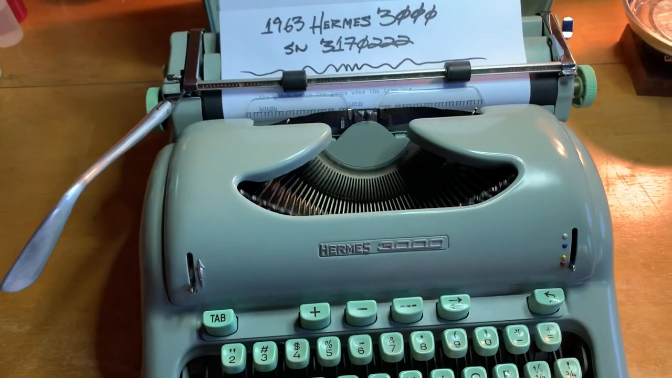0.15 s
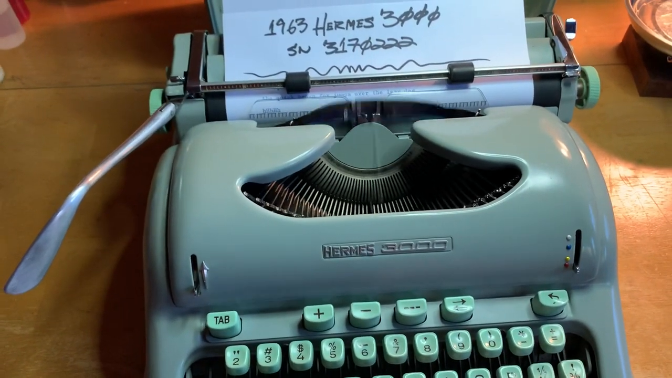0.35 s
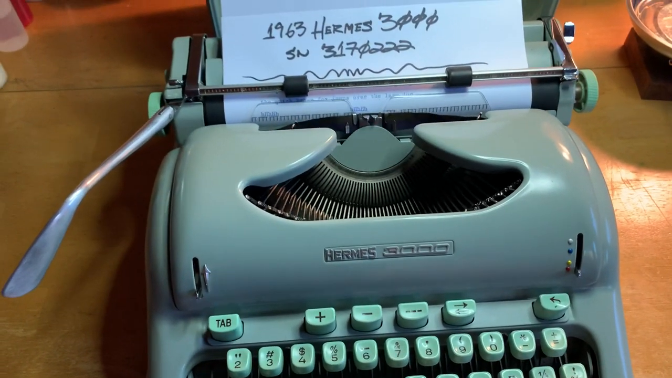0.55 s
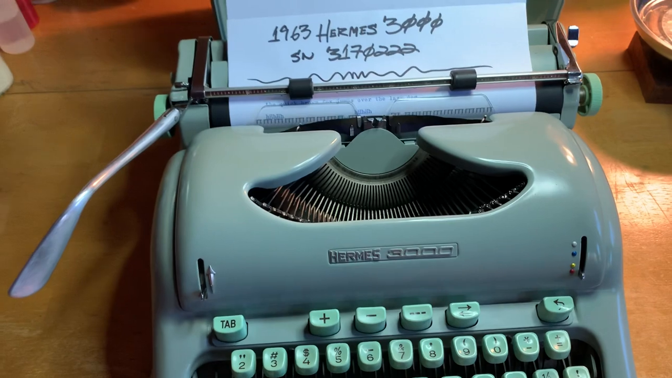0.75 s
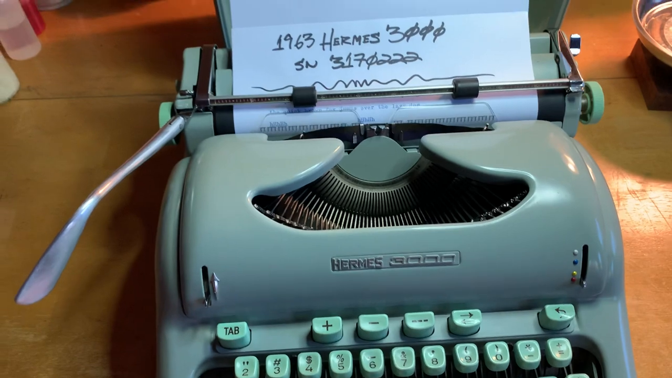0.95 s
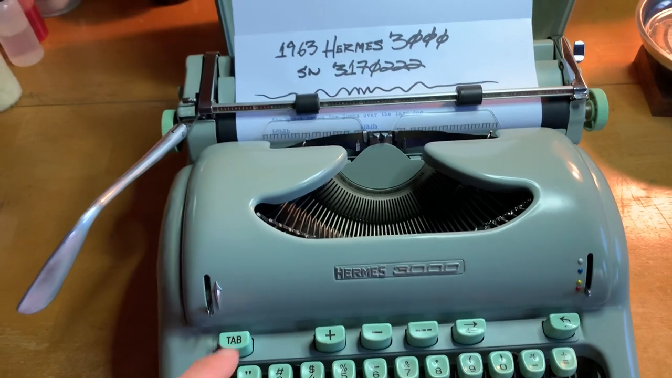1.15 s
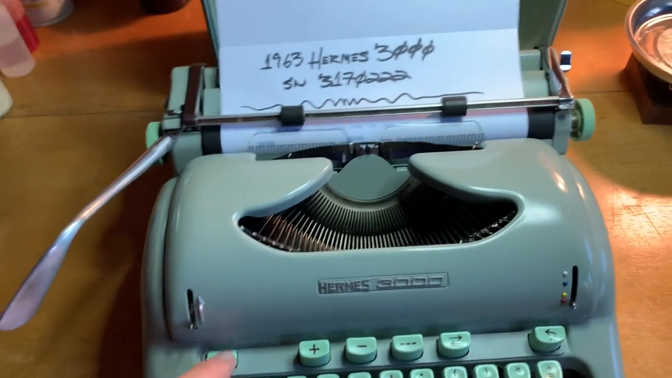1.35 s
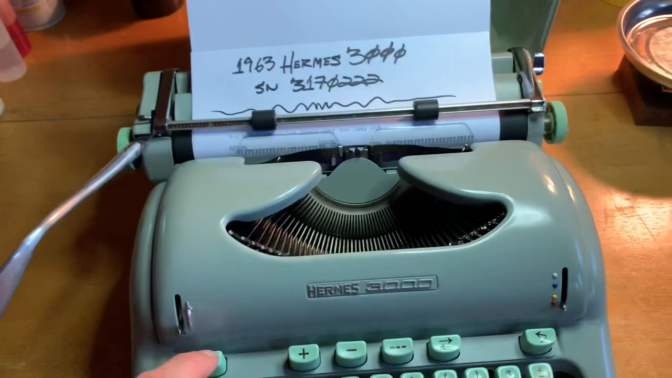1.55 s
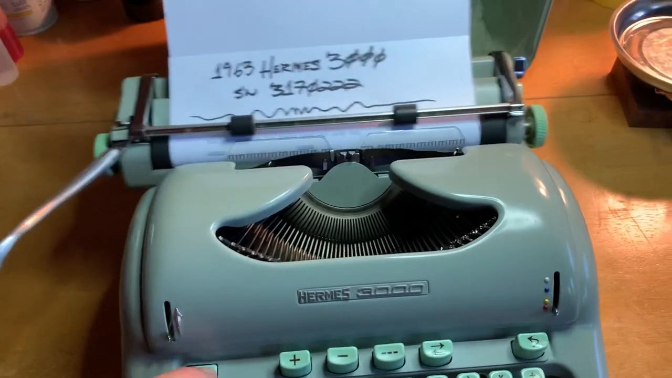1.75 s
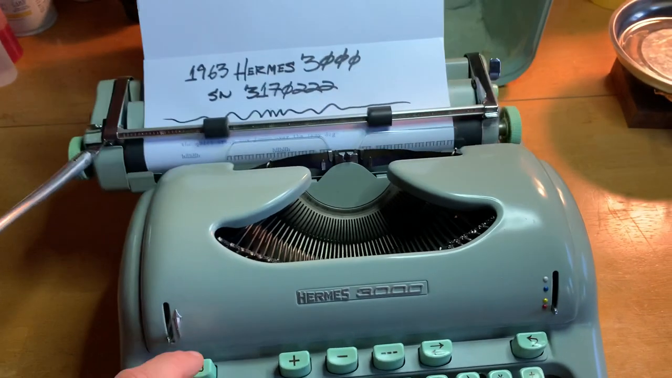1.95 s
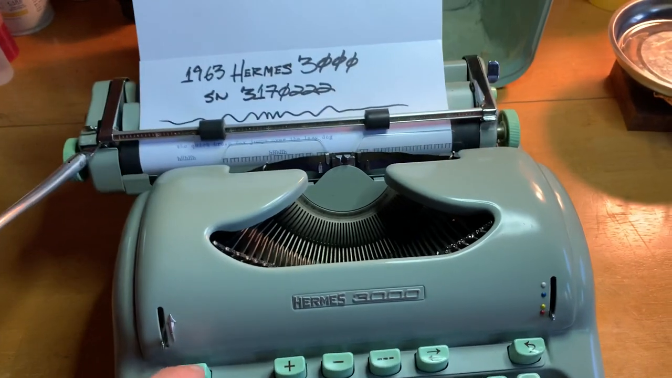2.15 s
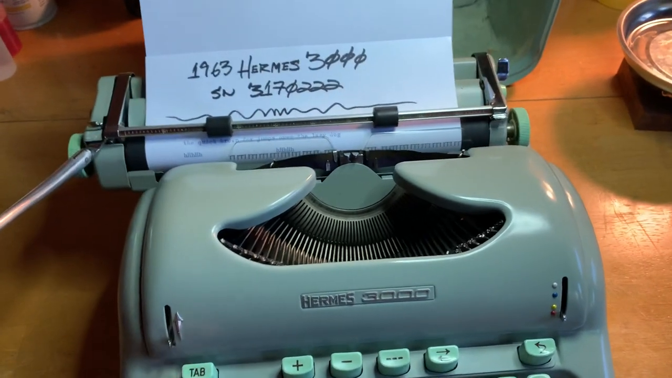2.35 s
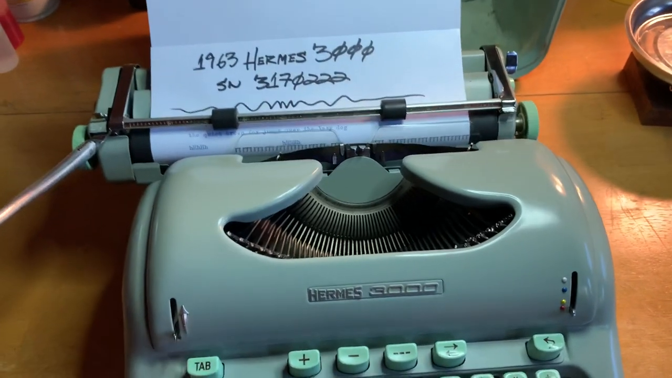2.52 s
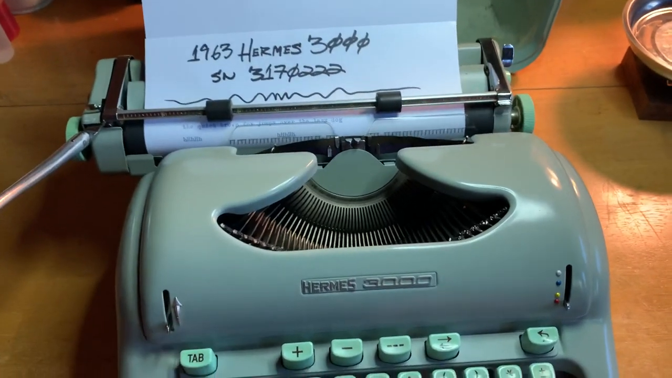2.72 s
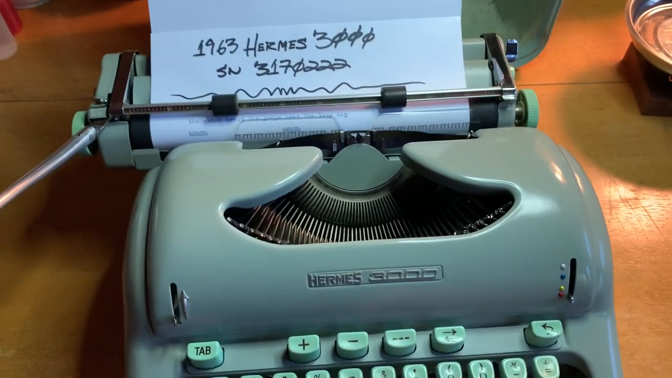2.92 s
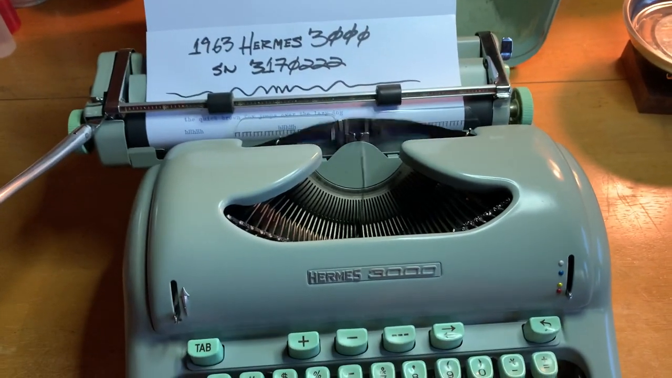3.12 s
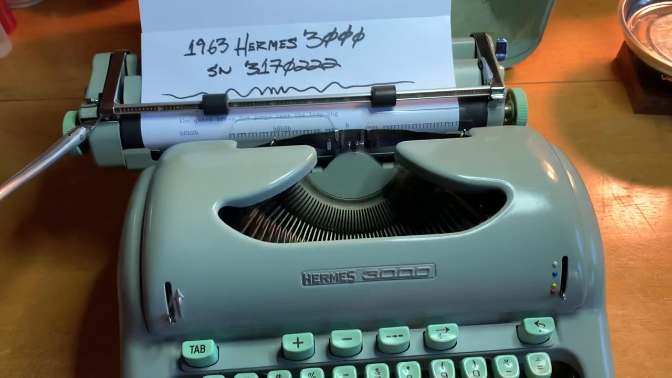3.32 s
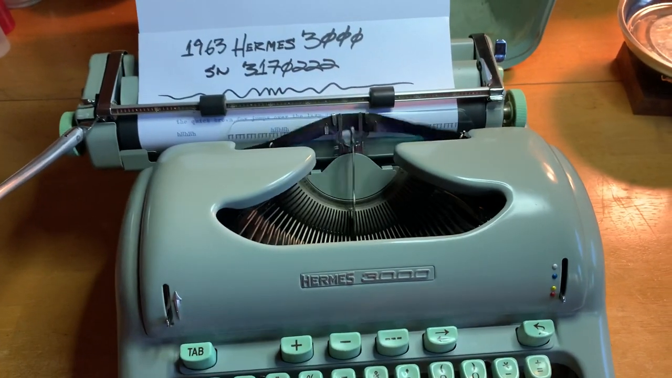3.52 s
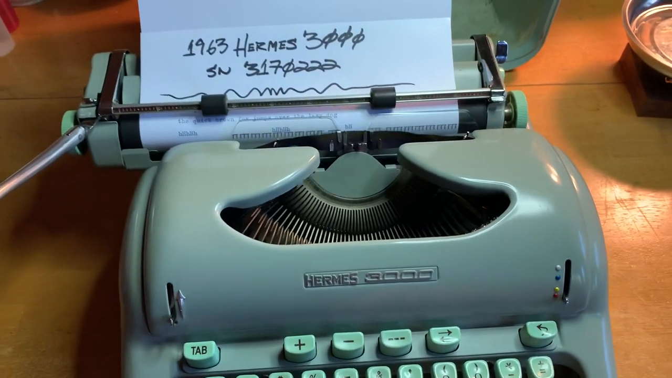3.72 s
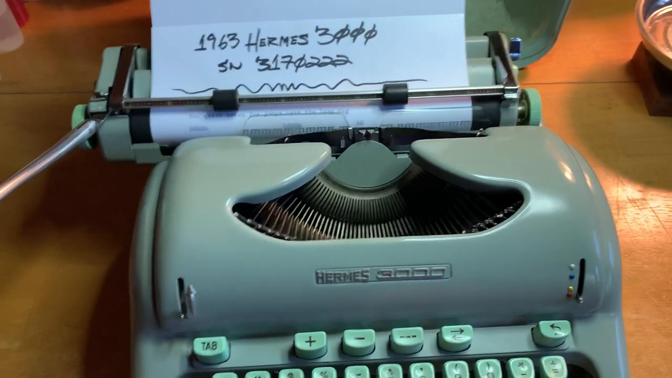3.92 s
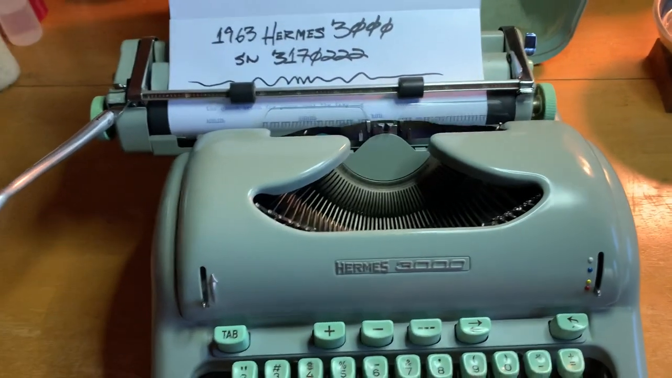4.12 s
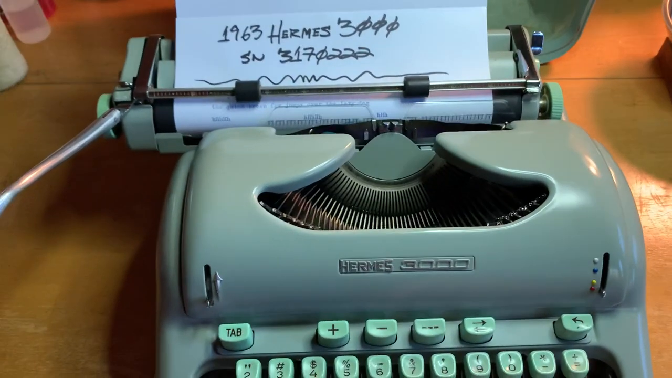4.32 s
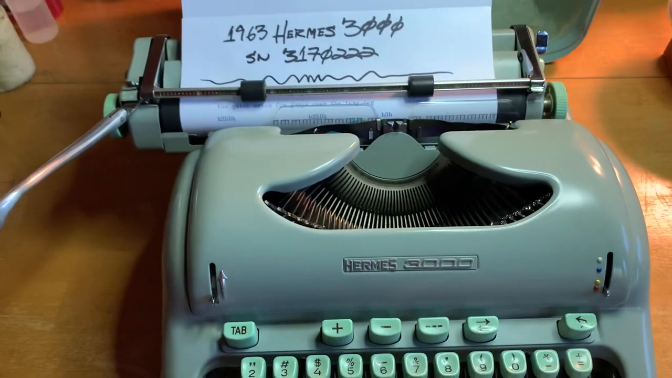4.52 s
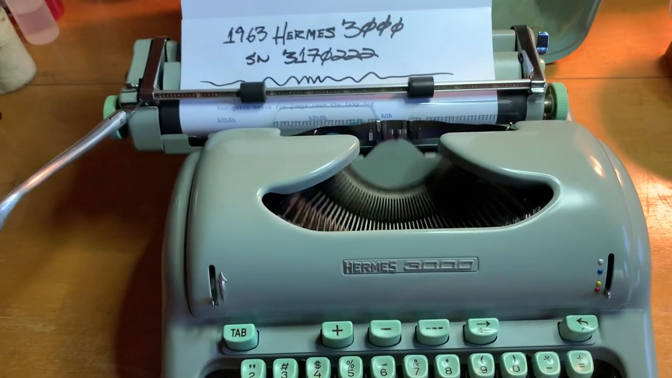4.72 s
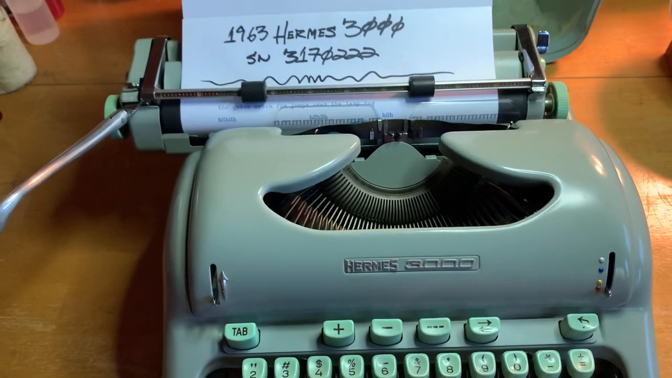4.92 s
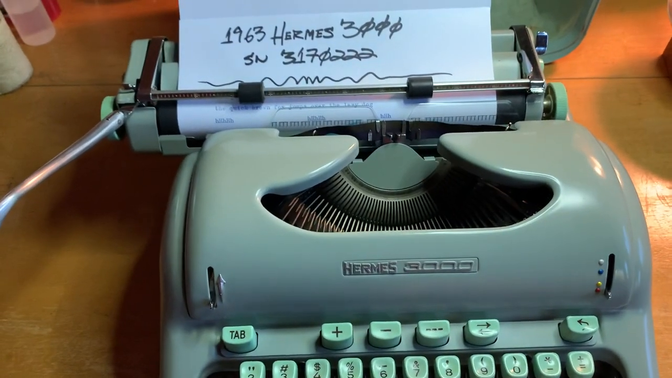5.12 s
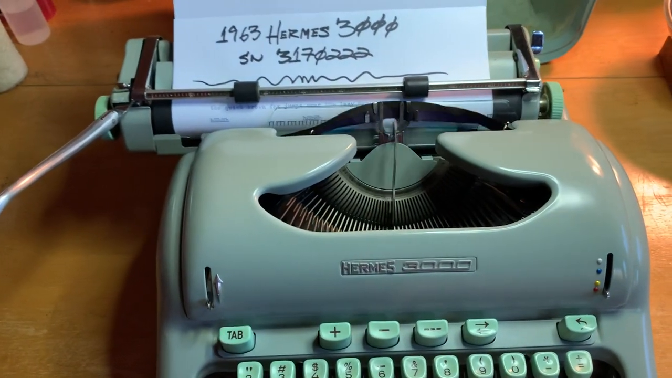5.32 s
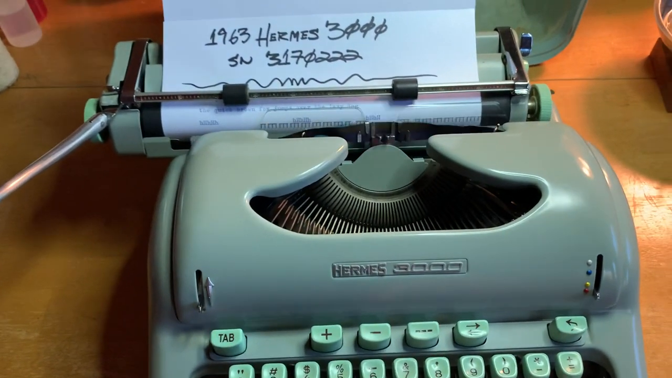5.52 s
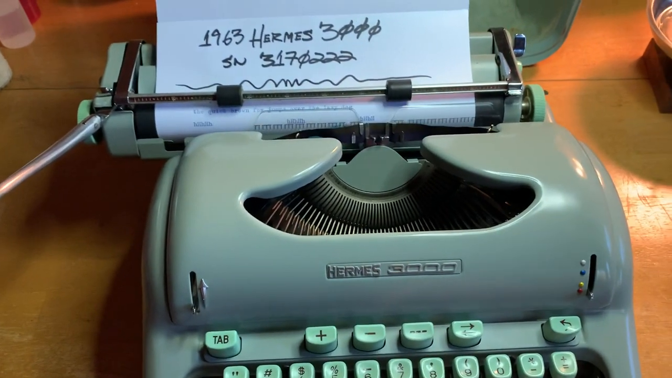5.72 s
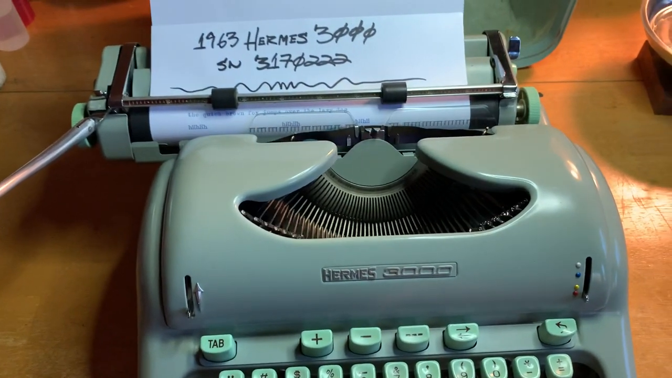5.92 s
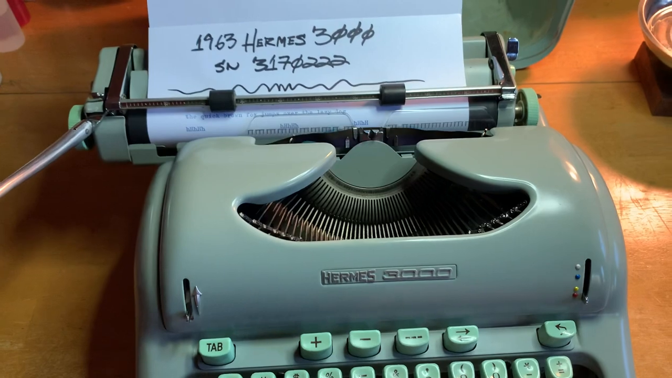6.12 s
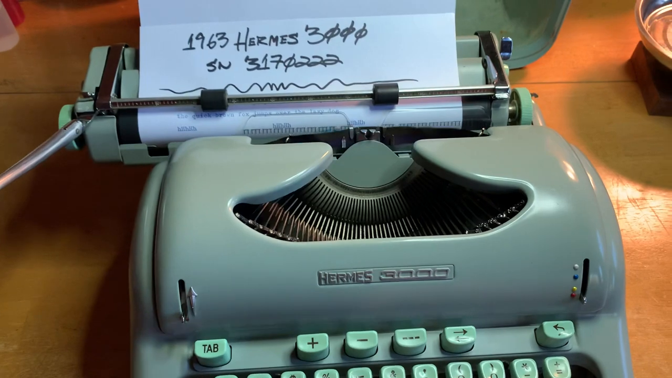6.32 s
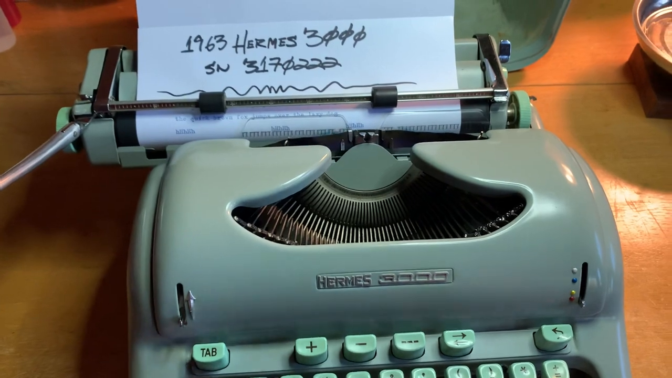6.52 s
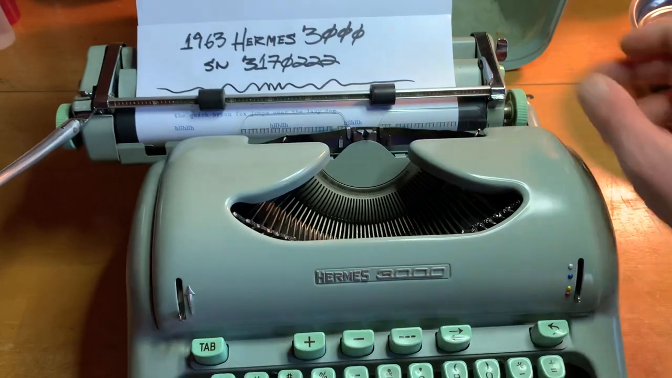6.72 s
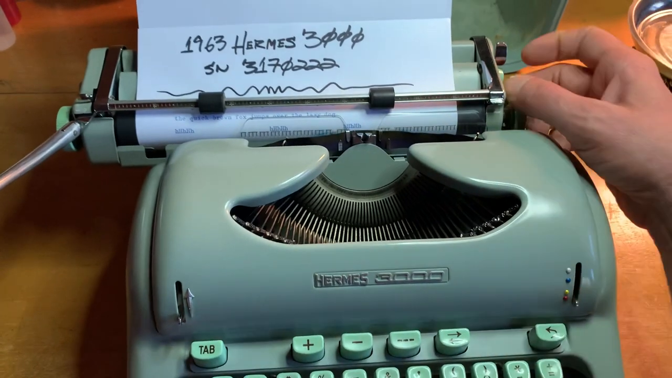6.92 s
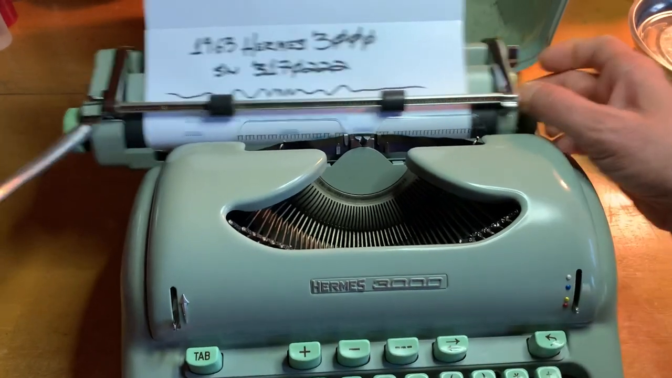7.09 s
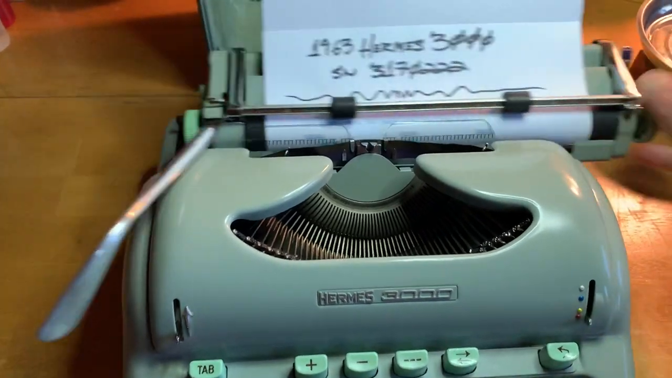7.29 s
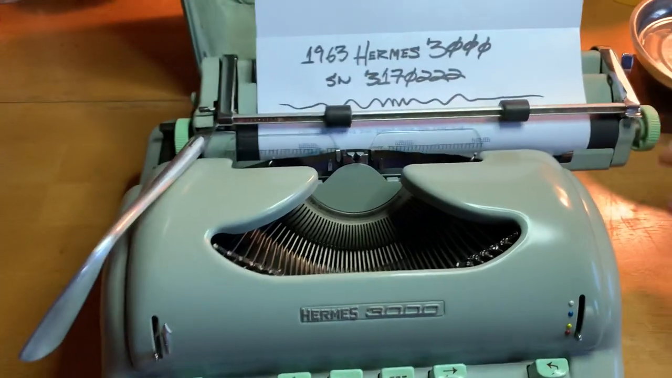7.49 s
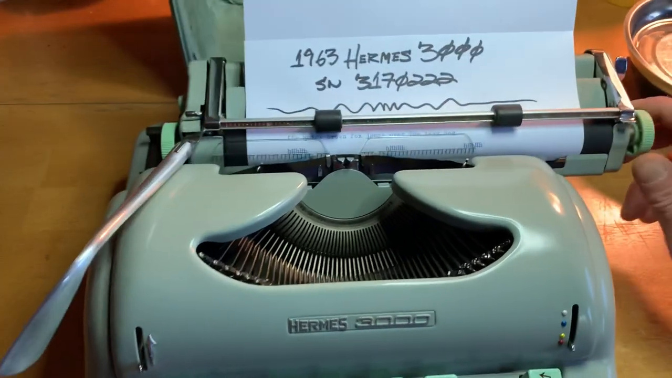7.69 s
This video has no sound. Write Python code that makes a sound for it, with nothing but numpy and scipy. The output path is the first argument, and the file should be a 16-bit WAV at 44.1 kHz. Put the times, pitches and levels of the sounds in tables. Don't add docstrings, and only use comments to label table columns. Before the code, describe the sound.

Mechanical typing at arm's length: hard, bright slaps of type bars on the roller, each with a small key tap before and a metallic drop after. Hollow shell knocks and low desk thumps accompany them. One letter, a rough clattering carriage run, silence, a group of three letters, then two isolated letters among heavy shift or space clacks, and a last carriage slide. Short room echo, low building drone and faint hiss remain underneath.

```python
import sys
import numpy as np
from scipy import signal
from scipy.fft import rfft, irfft, next_fast_len
from scipy.io import wavfile
from scipy.ndimage import uniform_filter1d

SR = 44100
rng = np.random.default_rng(int(sys.argv[2]) if len(sys.argv) > 2 else 0)


def volts_from_decibels(level):
    exponent = np.asarray(level, float) / 20
    return 10 ** exponent


def digitize_waveform(pressure):
    field = np.atleast_2d(pressure).T
    bounded = np.clip(field, -1, 1)
    quanta = np.round(bounded * 32767).astype(np.int16)
    wavfile.write(sys.argv[1], SR, quanta)


N = 341775

# start in seconds, steel level in dB, shell pitch in Hz,
# rattle in ms, delay of the swing back in ms.
STRIKES = [
    (0.3713, -10, 620, 4, 50),
    (3.0421, -10, 760, 7, 42),
    (3.509, -10, 565, 3, 68),
    (3.9699, -13, 750, 12, 73),
    (5.2843, -9.5, 823, 2.8, 54),
    (6.1945, -11, 812, 2.6, 56),
]
# start in seconds, steel level in dB, shell pitch in Hz, rattle in ms.
PRESSES = [
    (0.3361, -26.5, 450, 11),
    (3.0061, -31, 947, 11),
    (3.469, -34, 987, 19),
    (3.9361, -26, 588, 20),
    (5.251, -29, 832, 11),
    (6.1563, -29.5, 805, 33),
]
# start in seconds, steel level in dB, shell level in dB, rattle in ms.
FALLS = [
    (0.4884, -33, -33, 13.4),
    (3.1673, -36, -39, 20),
    (3.6402, -34.5, -33, 25),
    (4.1096, -34, -37.5, 14.7),
    (5.4202, -35, -31, 18),
    (6.3163, -34.5, -34, 14),
]
# start in seconds, steel level in dB, rattle in ms,
# desk sway in dB, desk top in dB.
SHIFTS = [
    (0.1578, -26.5, 12, -29.5, -30.5),
    (3.327, -31.5, 17, -22.5, -26),
    (3.7864, -34, 17, -32, -41.5),
    (4.7449, -17.5, 2.5, -24, -34),
    (5.845, -26.5, 9.1, -29, -29.5),
]
# frequency in Hz, level in dB, t60 in seconds.
SHELL_MODES = [(382, -15.5, 0.27), (450, 5.5, 0.036), (480, -4.5, 0.078), (575, -3.5, 0.098),
               (669.5, -3.5, 0.061), (741.5, -6.5, 0.074), (834.2, 1, 0.051), (902.4, -5, 0.055),
               (980, -1, 0.05), (1088, -11.5, 0.014), (1304.3, 0, 0.039), (1454, -3, 0.042),
               (1840, -6, 0.044)]
# frequency in Hz, level in dB, t60 in seconds.
DESK_MODES = [
    [(61.3, -7.5, 0.66), (77.9, 3.5, 0.44), (91.5, -5.5, 0.23), (105.3, -5.5, 0.43)],
    [(136.17, 1, 0.65), (140.83, 8, .45)],
    [(172.2, -5, 0.28), (206.7, 0, 0.17), (226.6, -5.5, 0.19), (275.4, -0.5, 0.087)],
]


def evened(x):
    return x / np.sqrt(np.mean(x ** 2) + 1e-20)


def read(points, hz, order=1):
    columns = np.transpose(points)
    return np.interp(np.log(hz + 1), np.log(columns[0] + 1), columns[order])


def add(mix, s, sound):
    part = mix[..., round(s * SR):][..., :sound.shape[-1]]
    part += sound[..., :part.shape[-1]]


def ringing(modes, rise_s, favoured_hz=None, detune=.033, count=SR // 3):
    t = np.arange(count) / SR
    hz, db, t60 = np.transpose(modes)[:, :, None]
    hz = hz * (1 + detune * rng.uniform(-1.1, 1, hz.shape))
    if favoured_hz:
        db = db - 9 * abs(np.log2(hz / favoured_hz))
    ring = (volts_from_decibels(db - 60 * t / t60) * np.sin(2 * np.pi * hz * t)).sum(0)
    ring = ring * (1 - np.exp(-t / rise_s))
    return ring / abs(ring).max()


def chatter(count, spread_db=2.0):
    sizes_db = spread_db * np.minimum(rng.exponential(1, count), 4)
    return evened(rng.standard_normal((2, count)) * volts_from_decibels(sizes_db))


def steel(x, treble_db):
    # frequency in Hz, level in dB per Hz.
    steel_colour = [(500, -23), (1100, -0.5), (1600, -8), (3500, -0.5), (7000, -4), (9000, -1), (12000, -4),
                    (15000, -6.5), (15800, -22), (16500, -40), (17500, -78.5)]
    # frequency in Hz, width in Hz, level in dB.
    link_peaks = [(1820, 160, 5), (2450, 180, 6), (3050, 200, 6), (3900, 250, 5), (5200, 280, 5),
                  (6600, 280, 5), (7400, 240, 5), (9700, 300, 5)]
    hz = np.fft.rfftfreq(x.shape[1], 1 / SR)
    moved = rng.uniform(.92, 1.08, len(link_peaks))
    bumps_db = sum(db / (1 + (2 * (hz - f * m) / w) ** 2) for (f, w, db), m in zip(link_peaks, moved))
    tilt_db = treble_db * np.clip(np.log2(hz / 2500 + 0.055) / 2, -.5, 1.3)
    return irfft(rfft(x) * volts_from_decibels(read(steel_colour, hz) + bumps_db + tilt_db), x.shape[1])


def hush():
    # frequency in Hz, level in dB per Hz.
    hush_colour = [(15, -41), (25, -21), (43, -2), (66, -3.5), (85, -19.5), (114, 1), (137, -14.5),
                   (263, -25), (560, -37.5), (1500, -46), (8000, -53.5), (15000, -54)]
    hz = np.fft.rfftfreq(N, 1 / SR)
    wander = uniform_filter1d(uniform_filter1d(rng.standard_normal(N), 6000), 6000)
    swell = volts_from_decibels(1.5 * evened(wander))
    z = rfft(rng.standard_normal((2, N))) * volts_from_decibels(read(hush_colour, hz))
    drone, hiss = irfft(z * (hz < 220), N), irfft(z * (hz >= 220), N)
    return volts_from_decibels(-56) * evened(swell * drone + hiss)


def room(x):
    # frequency in Hz, t60 in seconds.
    room_decay = [(100, 1), (400, 0.75), (1040, 0.47), (2760, 0.46), (7280, 0.27), (15000, 0.27)]
    taps = np.zeros((2, 2, SR))
    starts = np.arange(300, SR - 10, 10)
    at = starts + rng.integers(0, 10, (2, 2, len(starts)))
    np.put_along_axis(taps, at, rng.choice([-1., 1.], at.shape), 2)
    hz, t, z = signal.stft(taps, SR, nperseg=128)
    tails = signal.istft(z * volts_from_decibels(-60 * t / read(room_decay, hz)[:, None]), SR, nperseg=128)[1]
    turn = 2 * np.pi * 9 * np.arange(N) / SR
    fed = x * np.array([np.cos(turn), np.sin(turn)])[:, None]
    return signal.fftconvolve(fed, tails / np.linalg.norm(tails[0, 0]), axes=2)[..., :N].sum(0)


def thuds():
    # start in seconds, desk sway in dB,
    # desk top in dB, base plate in dB.
    shoves = [(0.088, -56, -54.5, -52), (1.331, -43.5, -47.5, -42), (1.455, -41.5, -67, -47.5),
              (1.52, -41.5, -40, -42.5), (1.557, -37.5, -51.5, -38.5), (1.678, -41.5, -37, -43.5),
              (1.834, -36, -38, -38.5), (1.902, -33, -34, -34), (2.649, -51, -56.5, -53.5),
              (4.68, -46, -58.5, -55.5), (5.762, -58.5, -46.5, -54), (6.817, -50.5, -53.5, -39),
              (7.137, -43, -46, -56), (7.199, -45, -44, -55), (7.26, -46.5, -47, -59.5),
              (7.38, -35, -47.5, -38)]
    presses = [(s, -42.5, -42, -45) for s, *_ in PRESSES]
    strikes = [(s, -34.5, -46.5, -37.5) for s, *_ in STRIKES]
    swings = [(s + later_ms / 1000, -33.5, -39, -36.5) for s, *_, later_ms in STRIKES]
    falls = [(s, -41, -40, -40.5) for s, *_ in FALLS]
    shifts = [(s, sway, top, sway - 6.5) for s, *_, sway, top in SHIFTS]
    return presses + strikes + swings + falls + shoves + shifts


def desk():
    out = np.zeros(N)
    for s, *levels_db in thuds():
        for db, modes in zip(levels_db, DESK_MODES):
            add(out, s, volts_from_decibels(db + 1.5) * ringing(modes, 0.005, detune=.012, count=16384))
    return out


def rubbing():
    # start, fastest moment and end in seconds, steel level in dB, shell level in dB.
    carriage_runs = [
        (1.33, 1.5, 1.48, -58, -47),
        (1.64, 1.8, 1.95, -58, -49),
        (7.06, 7.21, 7.34, -44.5, -42),
    ]
    lever_creeps = [
        (3.24, 3.31, 3.33, -57, -44),
        (4.67, 4.71, 4.74, -53, -46.5),
        (5.72, 5.785, 5.84, -55, -48),
    ]
    soft_brushes = [
        (0.0, 0.005, 0.069, -64.5, -60.5),
        (0.68, 0.76, 0.87, -81, -66),
        (2.79, 2.81, 2.87, -71, -64.5),
        (4.89, 4.92, 5.07, -85.5, -54.5),
        (6.54, 6.56, 6.67, -59.5, -71.5),
        (7.04, 7.06, 7.09, -79, -61),
    ]
    levels = np.zeros((3, N))
    for rows, treble_db in (carriage_runs, -3.5), (lever_creeps, 0.5), (soft_brushes, -26):
        for start, fastest, end, steel_db, shell_db in rows:
            t = np.arange(start, end, 1 / SR)
            slow_db = -19 * np.interp(t, [start, fastest, end], [1, 0, 1]) ** 1.2
            rows_db = [steel_db + slow_db, steel_db + treble_db + 1.1 * slow_db, shell_db + 0.6 * slow_db]
            add(levels, start, volts_from_decibels(np.array(rows_db)))
    return uniform_filter1d(levels, size=600)


def slides():
    steel_level, treble_level, shell_level = rubbing()
    teeth = volts_from_decibels(1.9 * evened(uniform_filter1d(rng.standard_normal(N), 150)))
    rub = steel(chatter(N, spread_db=2) * teeth, 0)
    dull = signal.sosfiltfilt(signal.butter(2, 4800, fs=SR, output="sos"), rub)
    body = ringing(SHELL_MODES + DESK_MODES[2], 0.0082, count=2048)
    rumble = signal.fftconvolve(chatter(N, spread_db=2.5), body[None], axes=1)[:, :N]
    return steel_level * evened(dull) + treble_level * evened(rub - dull), shell_level * evened(rumble)


def hand_blows():
    # start in seconds, steel level in dB, extra treble in dB, shell pitch in Hz.
    finger_ticks = [(0.0577, -50, -8, 1020), (0.0896, -43.5, -11, 463), (0.1084, -49, -3, 511),
                    (2.6504, -68.5, -15, 548), (2.681, -52, -3.5, 469), (2.8793, -57.5, -1, 1347),
                    (3.2651, -44, -3.5, 458), (4.6504, -50.5, 13, 983), (4.6617, -45.5, -6, 1040),
                    (4.6893, -56.5, -11, 460), (4.9121, -48.5, -25.5, 1000), (5.0265, -55, -21, 730),
                    (5.5545, -35.5, 4, 1094), (5.7253, -55, -21, 420), (5.7523, -45, -5.5, 1070),
                    (5.7794, -44.5, -13, 453), (6.549, -56.5, -14, 960), (6.8388, -53.5, 0, 613),
                    (7.0308, -51, 6, 1154), (7.0409, -46, -2.5, 490), (7.0731, -54.5, -5, 406),
                    (7.0879, -60, -1, 447), (7.3124, -57.5, 1, 407)]
    # start in seconds, steel level in dB, extra treble in dB,
    # shell level in dB, shell pitch in Hz.
    knuckles = [
        (6.8168, -49, -13, -41.5, 380),
    ]
    ticks = [(s, db, treble, db - 6.5 - .15 * treble, hz, 3.2) for s, db, treble, hz in finger_ticks]
    return [(ticks, .3, .8), ([(*row, 5.9) for row in knuckles], .3, .6)]


def carriage_blows():
    # start in seconds, steel level in dB, extra treble in dB, shell pitch in Hz.
    tab_stops = [(1.292, -57.5, -3.5, 980), (1.3286, -40.5, -7.5, 337), (1.3439, -36, -1, 980),
                 (1.3744, -50, -4, 467), (1.4196, -58, -3, 396), (1.4454, -42.5, -2.5, 899),
                 (1.4557, -35, -3, 694), (1.4723, -36.5, -7, 494), (1.4904, -37, -7.5, 593),
                 (1.5224, -35.5, 2, 980), (1.5354, -32.5, -16, 970), (1.5557, -40.5, -2, 1180),
                 (1.5597, -33, -16.5, 485), (1.5897, -54, -16.5, 404), (1.625, -57.5, 5, 382),
                 (1.6575, -40, -6.5, 983), (1.6693, -37.5, 1.5, 480), (1.6766, -31, -2, 520),
                 (1.7502, -54, 1, 476), (1.8159, -43, -1.5, 485), (1.8274, -38.5, 0, 933),
                 (1.8354, -29, -3, 860), (1.8493, -27.5, -5.5, 1020), (1.8669, -39.5, -3, 610),
                 (1.9026, -29.5, -8, 960), (1.9119, -34, -16.5, 471), (7.3695, -49.5, -8, 298),
                 (7.3779, -39.5, -0.5, 850), (7.3854, -34.5, -6.5, 1000)]
    # start in seconds, steel level in dB.
    carriage_steps = [
        (0.4389, -36),
        (3.1099, -34),
        (3.581, -39.5),
        (4.0491, -40.5),
        (5.3554, -37.5),
        (6.2656, -33),
    ]
    tabs = [(s, db, treble, db - 4.5 - .15 * treble, hz, 11) for s, db, treble, hz in tab_stops]
    steps = [(s, db, -10, db - 1.5, 1050, 8) for s, db in carriage_steps]
    return [(tabs, .6, .9), (steps, 1.2, .6)]


def basket_blows():
    clicks = [(s, db, -2, db - 14, 1028, ms) for s, db, ms, *_ in SHIFTS]
    landings = [(s + .0076, db - 9, -9, -19 + top / 3, 514, 6) for s, db, _, _, top in SHIFTS]
    return [(clicks, .3, .6), (landings, 2.5, 0)]


def keystroke_blows():
    presses = [(s, db, 5 * np.log2(hz / 620), -34, hz, ms) for s, db, hz, ms in PRESSES]
    trips = [(s - .0086, -24 - .3 * ms, 5, -70, hz, 10) for s, _, hz, ms, _ in STRIKES]
    slaps = [(s, db - 5.5, -4, -25.5, hz, ms) for s, db, hz, ms, _ in STRIKES]
    bounces = [(s + .0105, db - 7, -3, shell - 6.5, hz, 3) for s, db, _, shell, hz, _ in slaps]
    swings = [(s + later_ms / 1000, -28, -0.5, -45.5, 900, 10) for s, *_, later_ms in STRIKES]
    falls = [(s, db, 0, shell, 970, ms) for s, db, shell, ms in FALLS]
    return [(presses, .4, 0), (trips, .6, 0), (slaps, 1.5, 3.4), (bounces, .8, .6),
            (swings, 12, 0), (falls, .3, .6)]


def blows():
    bright, shell = np.zeros((2, N)), np.zeros((2, N))
    t = np.arange(-1024, 4096) / SR
    after, before = np.maximum(t, 0) * 1000, np.minimum(t, 0) * 1000
    cracks = sum(np.exp(-((after - ms) / .22) ** 2) for ms in (1.9, 3.7))
    echo = volts_from_decibels(-7 - 60 * t / 0.07) * (1 - np.exp(-after / 3))
    for rows, rise_ms, crack in hand_blows() + carriage_blows() + basket_blows() + keystroke_blows():
        for s, steel_db, treble_db, shell_db, hz, ms in rows:
            shape = (1 - np.exp(-after / rise_ms)) * np.exp(-(after / max(ms, 1)) ** 0.88)
            rattle = chatter(len(t))
            lumps = volts_from_decibels(2.5 * evened(uniform_filter1d(rng.standard_normal(len(t)), size=200)))
            blow = rattle * shape * lumps + crack * cracks * np.sign(rattle)
            blow += uniform_filter1d(rattle * lumps * echo * np.sqrt(ms / 8), size=2)
            approach = rattle * np.exp(before / 7) * (t < 0)
            approach = volts_from_decibels(-10.5) * uniform_filter1d(uniform_filter1d(approach, size=5), size=4)
            add(bright, s + t[0], volts_from_decibels(steel_db + 4.5) * steel(blow + approach, treble_db))
            shove = rng.standard_normal((2, len(t))) * shape ** 1.8
            ring = ringing(SHELL_MODES, 0.0016, hz, count=4096)
            knock = signal.fftconvolve(shove / np.linalg.norm(shove[0]), ring[None], axes=1)
            add(shell, s + t[0], volts_from_decibels(shell_db + 7.5) * knock)
    return bright, shell


def scene():
    (bright, shell), (run_bright, run_shell) = blows(), slides()
    near = bright + run_bright + shell + run_shell + desk()
    return near + volts_from_decibels(-13) * room(near) + hush()


def band_limit(x):
    return signal.sosfilt(signal.butter(12, 16980, fs=SR, output="sos"), x)


def record(dry):
    # frequency in Hz, likeness from 0 to 1, lead of the left in radians.
    port_pair = [(60, .98, -.33), (150, .98, -.33), (300, .99, -.1), (500, .93, .4), (1000, .85, .8),
                 (1500, .72, 1), (2300, .55, 1.4), (3300, .6, 2.1), (4200, .6, 3), (5500, .6, 3.3),
                 (6800, .55, 6.2), (7500, .7, 6), (8300, .995, 6)]
    # frequency in Hz, left over right in dB.
    port_lean = [(300, 1.5), (700, -2), (1300, 0), (4400, 1), (5800, -5.5), (7000, 1), (8500, 2)]
    joint_hz, comb_hz, even_hz, hold_hz = 7000, 3150, 10250, 14975
    size = next_fast_len(N + 4096)
    hz = np.fft.rfftfreq(size, 1 / SR)
    a, b = rfft(dry, size)
    copied = 2 * np.pi * (np.minimum(hz, hold_hz) - even_hz) / comb_hz
    like = read(port_pair, hz) - .2 * np.sin(copied) ** 2 * (hz > joint_hz)
    stepped = copied - .4 * np.sin(2 * copied)
    turn = np.where(hz > joint_hz, stepped, -read(port_pair, hz, order=2))
    right = like * a * np.exp(1j * turn) + np.sqrt(1 - like ** 2) * b
    lean = volts_from_decibels(read(port_lean, hz) / 2)
    ports = irfft(np.array([a * lean, right / lean]), size)[:, :N]
    mix = np.tanh(ports)
    return band_limit(mix)


dry = scene()
out = record(dry)
digitize_waveform(out)
```